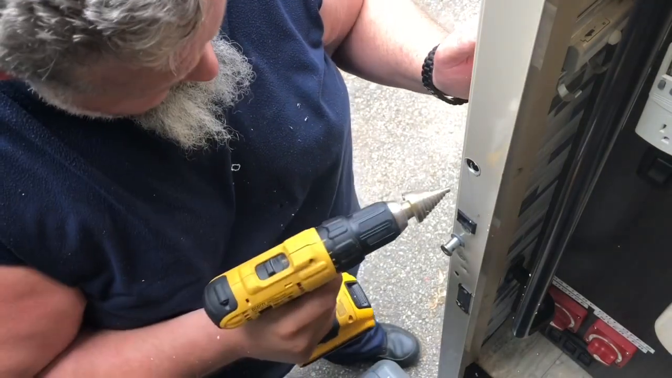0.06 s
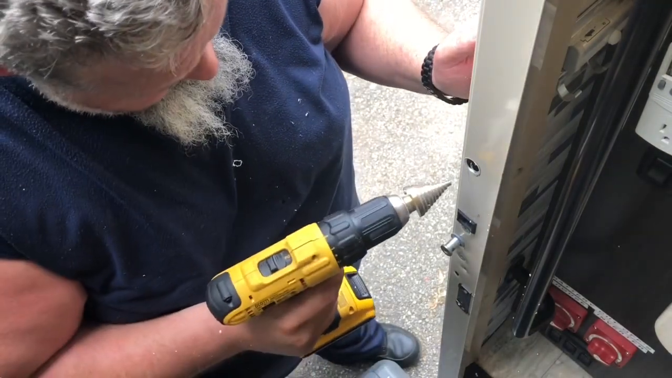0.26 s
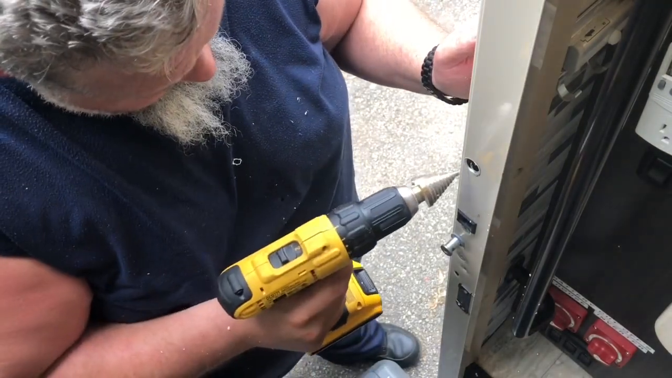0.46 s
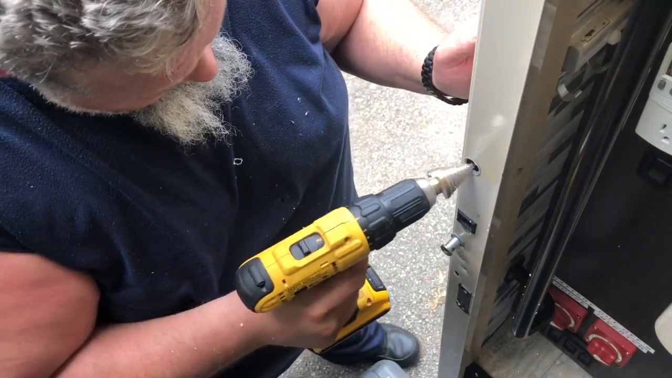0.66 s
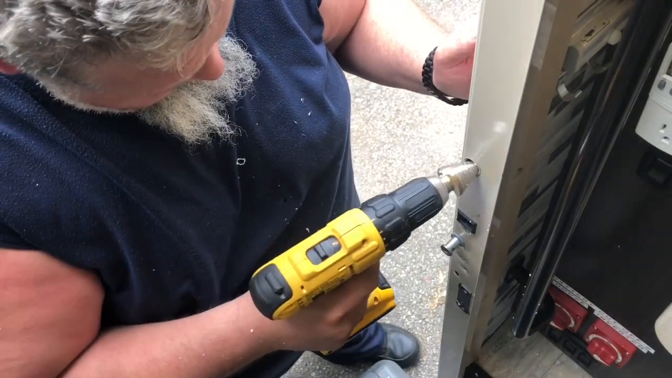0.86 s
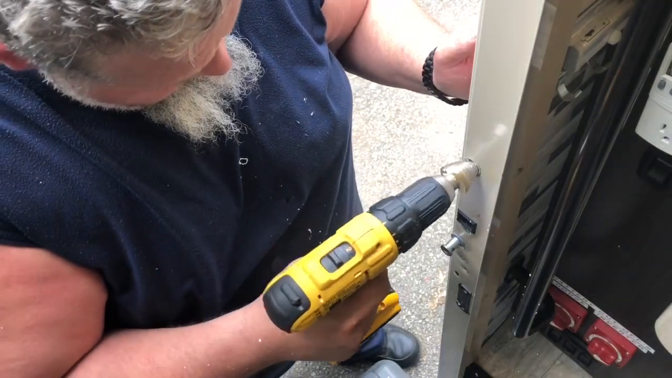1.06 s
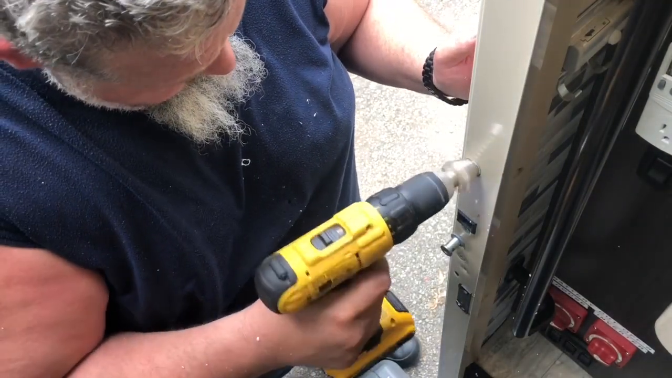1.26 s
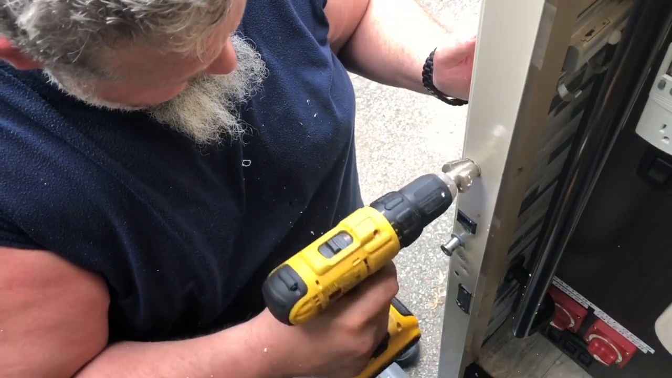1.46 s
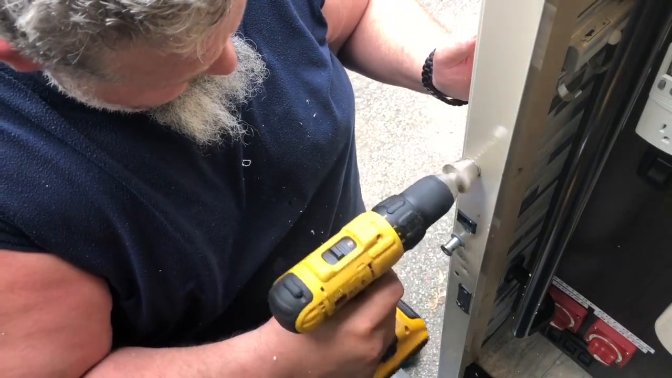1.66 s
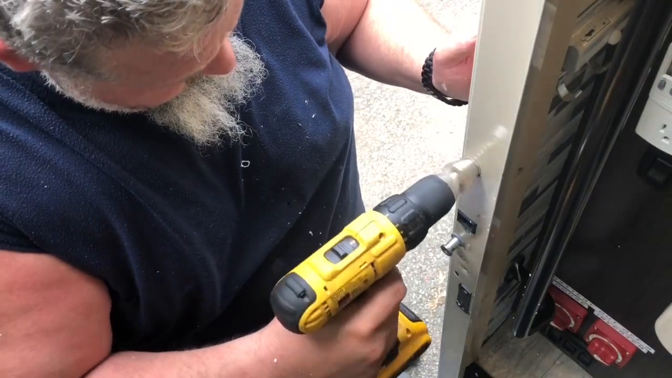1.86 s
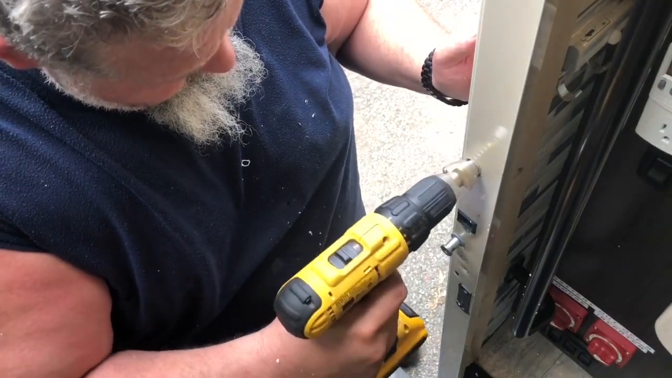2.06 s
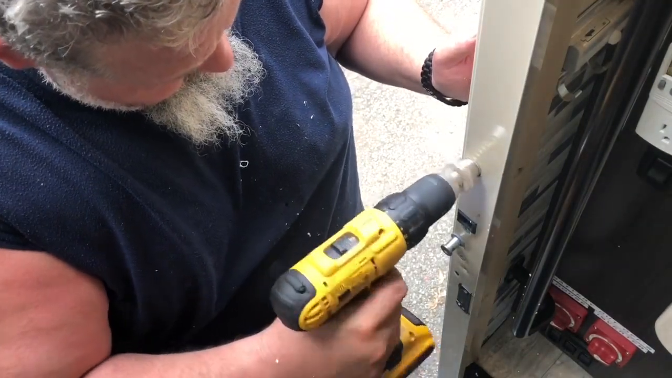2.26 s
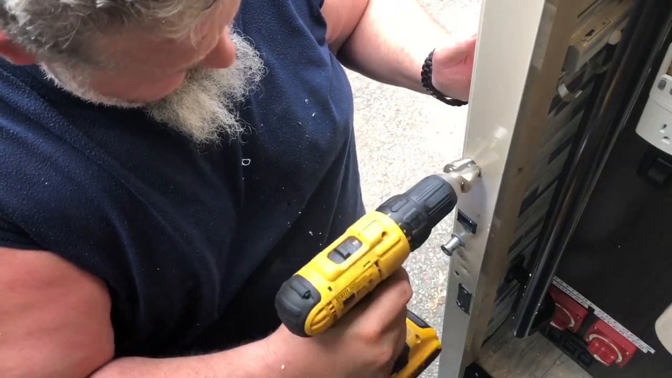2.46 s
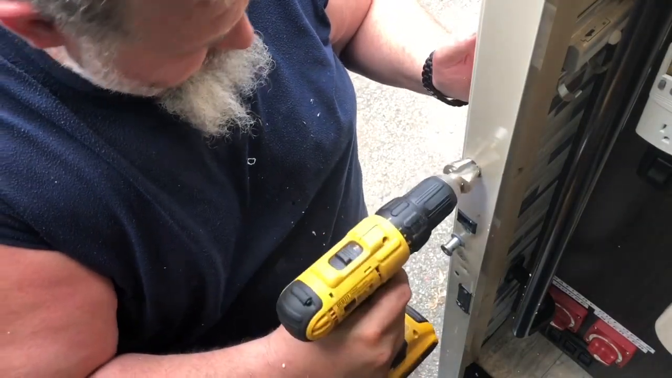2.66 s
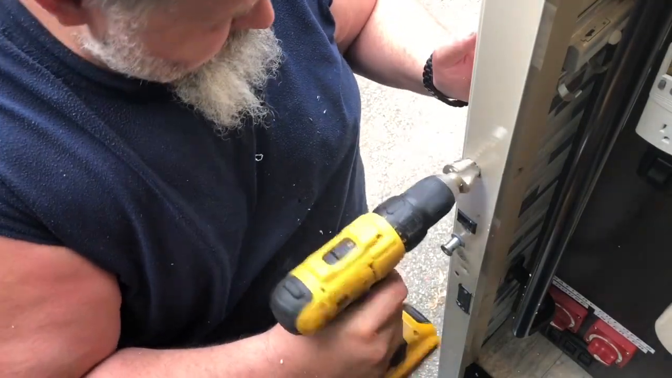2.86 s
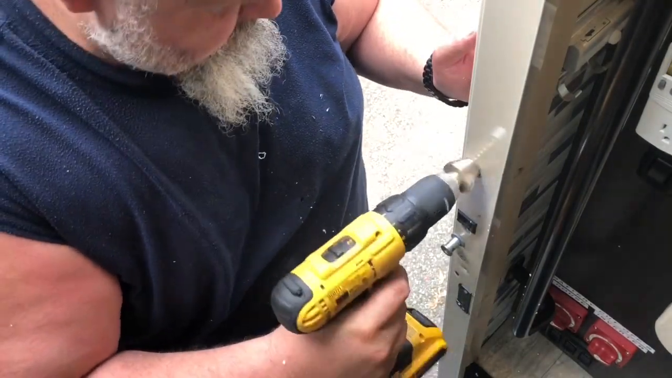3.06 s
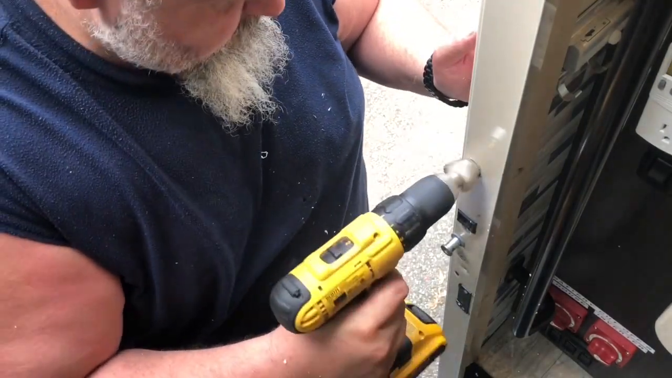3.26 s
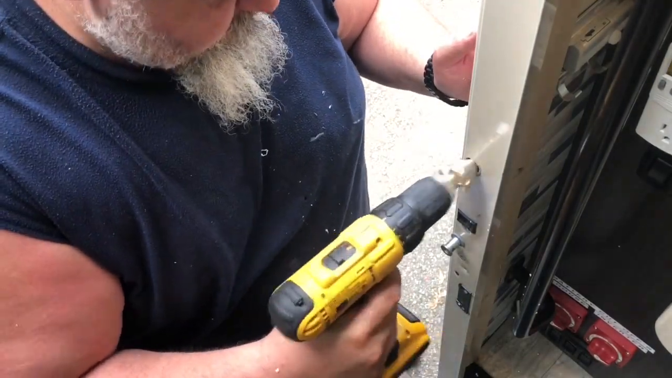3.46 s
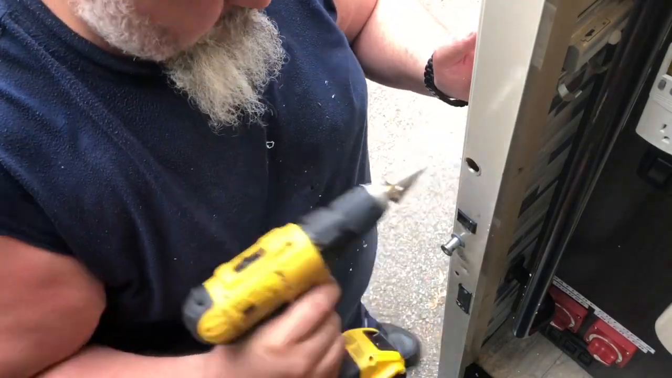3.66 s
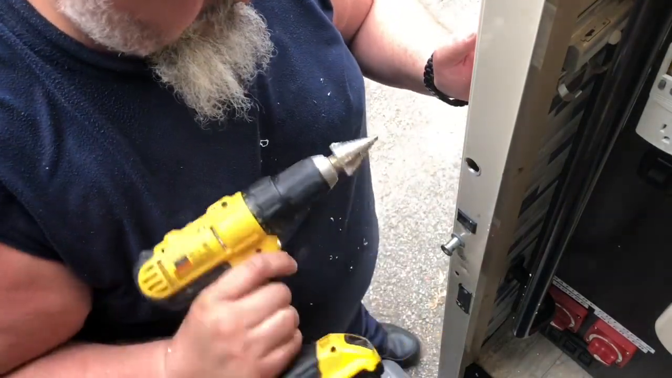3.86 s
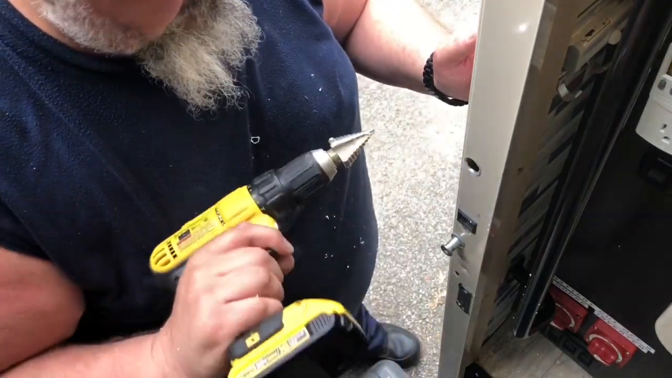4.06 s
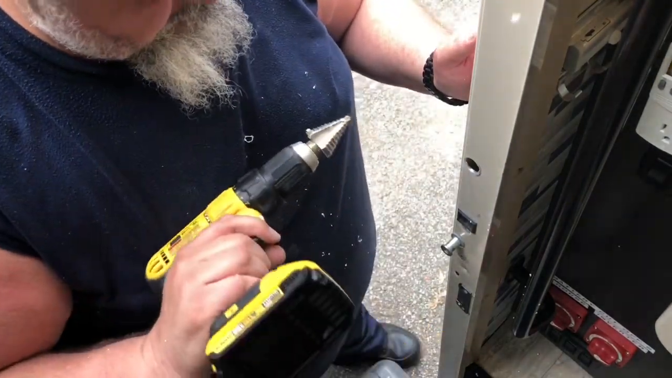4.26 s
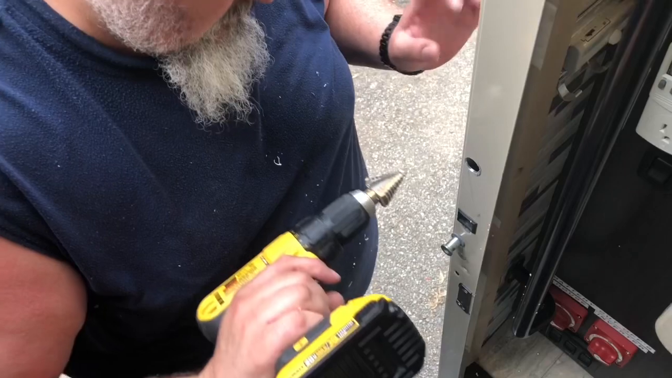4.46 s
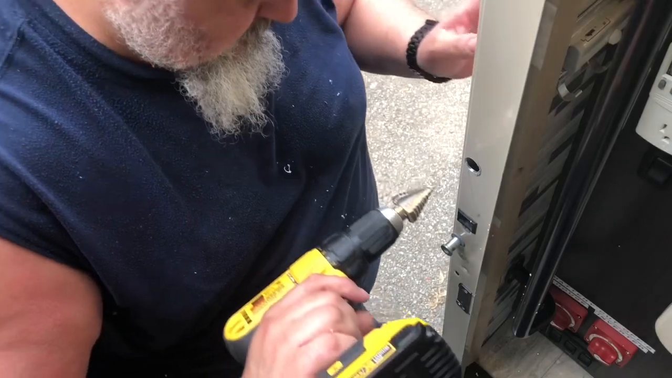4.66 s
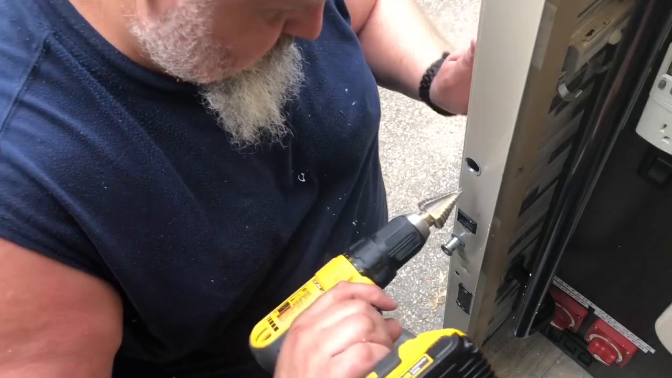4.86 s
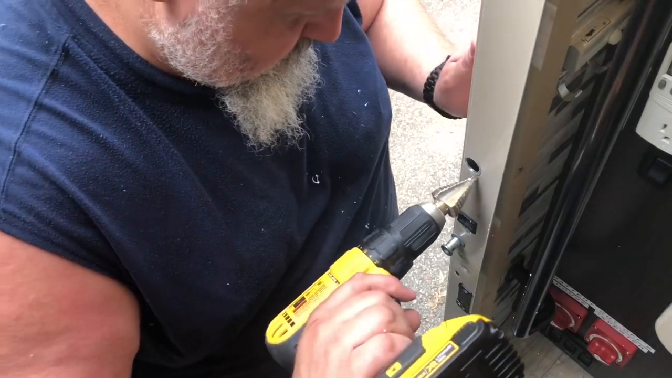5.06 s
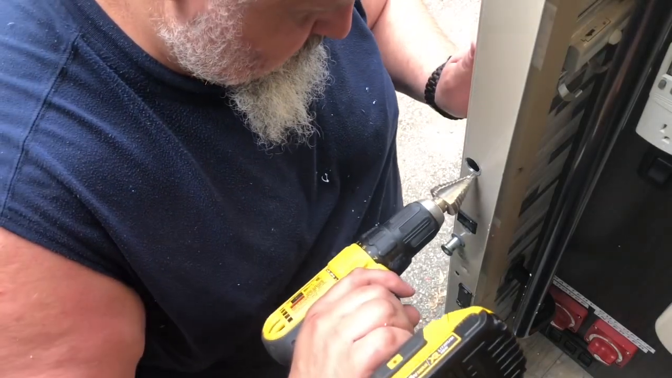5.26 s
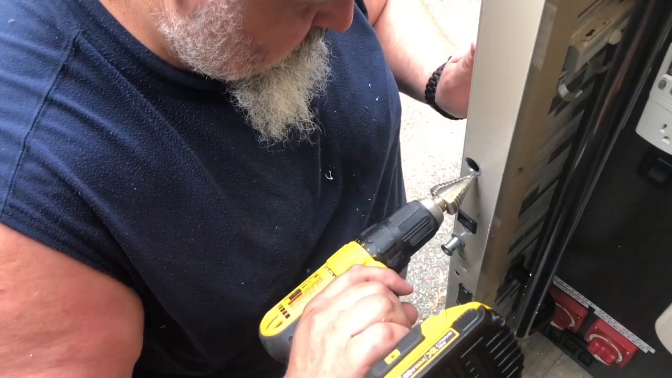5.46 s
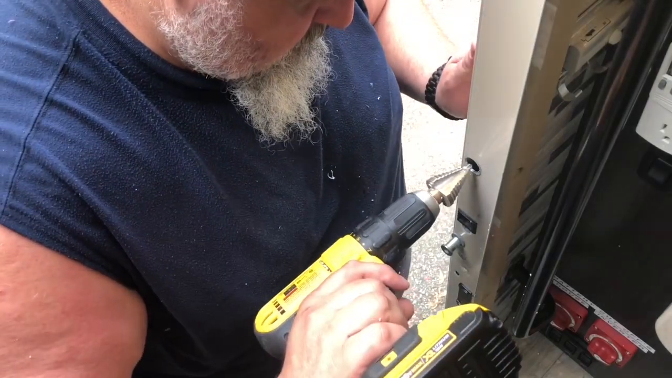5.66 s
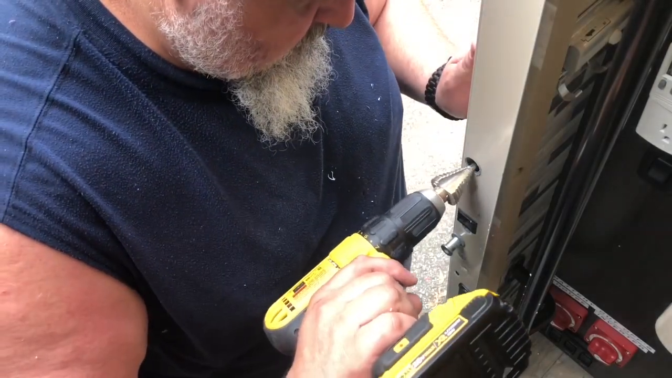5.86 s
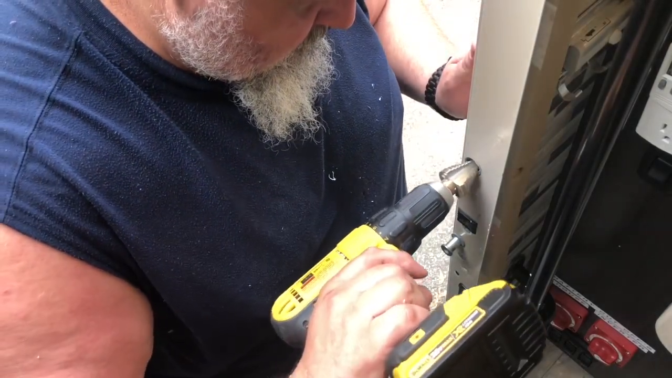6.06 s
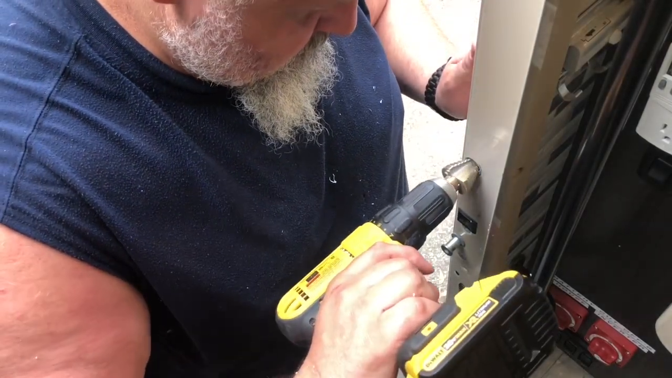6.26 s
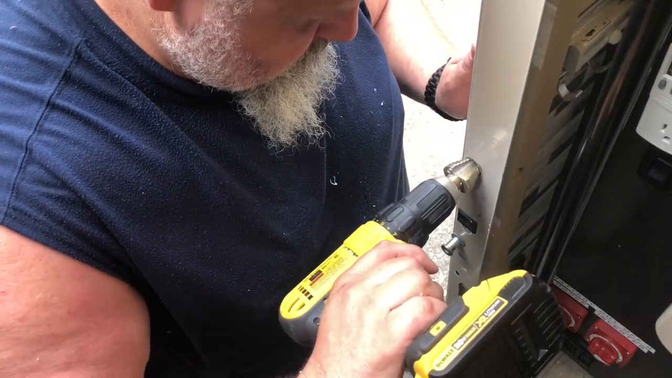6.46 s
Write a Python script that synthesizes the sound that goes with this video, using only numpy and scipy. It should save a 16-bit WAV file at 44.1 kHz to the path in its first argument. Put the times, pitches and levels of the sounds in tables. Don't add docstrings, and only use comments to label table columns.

```python
import sys
import numpy as np
from scipy import signal
from scipy.fft import rfft, irfft, next_fast_len
from scipy.io import wavfile
from scipy.ndimage import uniform_filter1d, map_coordinates

SR = 44100
rng = np.random.default_rng(int(sys.argv[2]) if len(sys.argv) > 2 else 0)


def unload_wav(signal):
    wavfile.write(
        sys.argv[1],
        SR,
        np.round(np.clip(np.atleast_2d(signal).T, -1, 1) * 32767).astype(np.int16),
    )


def linear_from_db(decibels):
    return 10 ** (np.asarray(decibels, float) / 20)


N = 287091

# time in seconds, hum level in dB, change of the air leak in dB.
SHOP_LEVELS = [(0, -37.5, -0.5), (1.5, -36, 1.5), (2.8, -37.5, 0.5), (3.6, -37.5, 1.5), (4.4, -39, 1.5),
               (5.1, -37, -1), (5.8, -35, 1), (6.51, -38, 2.5)]
# frequency in Hz, level in dB.
MOTOR_TONES = [(163.5, -38), (930, -57.5), (1140, -62), (120, -47.5), (468, -60), (354, -56)]
# frequency in Hz, level in dB per Hz.
HUM_COLOUR = [(15, -62), (25, -42), (70, -10), (138, -4), (153, -5), (176, -1), (195, -11), (264, -11),
              (299, -12), (349, -9.5), (379, -17.5), (448, -20.5), (494, -23.5), (700, -26), (910, -30),
              (1540, -120)]
HISS_COLOUR = [(350, -1.5), (500, 1.5), (950, -0.5), (1500, -3), (2500, -6.5), (4000, -12), (6000, -38)]
AIR_COLOUR = [(3500, -5.5), (5000, 0.5), (7000, -4.5), (9000, -10.5), (16000, -18)]
# time in seconds, gain as a plain factor.
SCENE_CHANGE = [
    (4.235, 0.91),
    (4.277, 0.0092),
    (4.305, 0.92),
]

# frequency in Hz, level in dB, time to fall 60 dB in seconds.
FRAME_MODES = [(290, -4, .1), (350, 0, .1), (468, 0, .09), (590, -1, .07), (710, 0, .07), (810, -1, .07),
               (1050, -2, .06), (1285, -2, .06), (1470, -5, .05), (1600, -3, .06), (1910, -6, .045),
               (2325, -7, .04), (3300, -8, .035), (3570, -10, .035), (4290, -10, .04)]
# frequency in Hz, sharpness, depth from 0 to 1.
HOLLOW = (2800, 4.5, .55)
# frequency in Hz, level in dB per Hz.
BITE_COLOUR = [(700, -10), (1400, 4.5), (2300, 1), (3400, 3), (4600, 3.5), (6500, -9.5), (10000, -47)]
TAP_COLOUR = [(800, -4.5), (1400, 2), (2200, 0), (3400, -2.5), (4800, -4), (6500, -19.5), (11000, -34)]
CLICK_COLOUR = [(1200, -32), (2000, -8), (2400, 3), (3300, 0), (4500, 3), (6500, -1), (11000, -24)]
FIZZ_COLOUR = [(4000, -32), (6000, 0.5), (9000, 9), (12000, 4), (16000, -2.5)]

# frequency in Hz, level in dB, time to fall 60 dB in seconds.
SPRING_TONES = [(8100, -48, 0.07), (11500, -29, .02), (13800, -36, 0.08)]
# time in seconds, peak in dB, time to fall 60 dB in seconds.
CHIP_DROPS = [
    (1.496, -30, .012),
    (1.509, -43, .01),
    (1.9936, -45, .012),
    (2.0391, -45, .012),
    (2.0601, -45, .01),
    (2.484, -50, .012),
    (2.563, -48, .01),
]
# time in seconds, peak in dB, brightness in dB.
HAND_CLICKS = [(0.5693, -48, -6), (3.1293, -37, -11), (3.1474, -38, 0), (3.1832, -20, -3.5),
               (3.207, -27, -10), (3.4642, -20, -12), (3.5543, -32.5, -9), (3.649, -29, -1.5),
               (3.939, -36, -2), (3.9544, -44, -12), (4.0638, -45, -3), (0.8037, -25, -12)]
# time in seconds, peak in dB, frame ring in dB, brightness in dB,
# centre of the ring in Hz.
TAPS = [(.6654, -34, 9, -9, 660), (.7339, -27.5, -1, -15, 479), (.779, -31, -8, -5, 1688),
        (.8018, -17, -7.5, -11, 697), (.833, -27.5, -2, -7, 686), (.8928, -20.5, 0, -3.5, 1550),
        (.939, -31, -1, -7, 755), (3.4243, -12, -4, -6.5, 1940), (3.4268, -15, -6, -9, 1300),
        (3.4348, -15, -15, -6, 1624), (3.4375, -17, -15, -6, 1300), (3.4916, -21, -3, -7, 700),
        (3.4965, -26, 5, -6, 416), (3.506, -27.5, 0, -1, 700), (5.0497, -18, -11, -15.5, 466),
        (5.8488, -32.5, 0.5, -4, 487), (5.9234, -19.5, -11.5, -11, 1463), (5.9314, -23.5, -20, -5, 464),
        (6.0132, -2, -11, -19, 786), (6.0344, -23.5, -2, -14, 474), (6.0494, -24, -12, -11, 456.5),
        (6.0994, -35, 12.5, -18, 476.4), (6.2963, -21, -3, 0, 1400), (6.3044, -19.5, -7, -19, 1638)]
# start in seconds, end in seconds, peak in dB, centre of the ring in Hz.
SKIDS = [
    (0.655, 0.659, -28, 1500),
    (3.481, 3.486, -27, 680),
    (3.514, 3.519, -27.5, 2400),
    (5.969, 5.989, -33, 480),
    (6.079, 6.088, -27, 900.6),
    (6.281, 6.302, -25, 1409),
]
# time in seconds, peak in dB.
SLAMS = [
    (6.0132, -3),
    (3.2979, -3),
]

# time in seconds, peak in dB, frame ring in
# dB, brightness in dB, centre of the ring in Hz.
EDGE_BITES = [(1.0934, -6.5, -13, -11, 1600), (1.1209, -1, -2.5, -2.5, 760), (1.1644, -25, 3, -9, 694),
              (1.2144, -10, 3.5, 5, 700), (1.2474, -10.5, 2, 6.5, 750), (1.2794, -19, -25, -20, 458.5),
              (1.3034, 11, -11.5, -8, 1230), (1.3359, 11.5, -12.5, -8.5, 425), (1.3773, 1, -3, -29, 454),
              (1.6581, -0.5, -6, -4.5, 560), (1.6944, -5.5, 0.5, -12, 310), (1.717, 0, -6, -14, 1570),
              (1.7564, -5, 3, -15, 471), (1.7779, 3, -2.5, -20, 403.6), (1.8213, 8, -16, -19, 480),
              (1.8472, 3, -4.5, -6, 1220), (1.8874, -12.5, 4, -15, 480), (1.9194, -19, 8.5, -10.5, 483),
              (2.1858, 5.5, -28, -8, 611), (2.2436, 2.5, -21, -17, 668), (2.2639, -6.5, -8, -1, 358),
              (2.9214, -5, -3.5, -2, 547), (2.9542, 2, -10, -12, 716), (2.9796, 7, -17.5, -11, 716),
              (3.0172, -1.5, -21, -5, 813), (3.0646, -18.5, 9.5, -25, 322), (3.2563, -15, 2, 7.5, 600),
              (3.2979, 3, -5, -16, 760), (3.3276, -0.5, 0, -8, 730), (3.3594, -13, 2.5, 8, 690)]
# time in seconds, frequency in Hz, peak in dB, length in seconds.
MODE_SHUDDERS = [(1.125, 800, -9.5, 0.0075), (1.135, 320, -16, 0.009), (1.172, 690, -14.5, 0.012),
                 (1.22, 605, -14, 0.016), (1.231, 746, -12.5, 0.016), (1.253, 770, -13, 0.012),
                 (1.283, 463, -15, 0.011), (1.307, 1260, -15, 0.016), (1.319, 350, -6, 0.0062),
                 (1.338, 910, -12.5, 0.012), (1.344, 1280, -17, 0.014), (1.345, 457, -14, 0.012),
                 (1.353, 327, -11, 0.0087), (1.384, 1040, -17, 0.027), (1.388, 490, -14, 0.028),
                 (1.664, 543, -15.5, 0.011), (1.695, 1300, -17, 0.011), (1.702, 306, -14, 0.0078),
                 (1.728, 1603, -14.5, 0.017), (1.73, 797, -14.5, 0.014), (1.736, 384, -13.5, 0.023),
                 (1.769, 360.1, -20, 0.032), (1.781, 820, -17, 0.012), (1.79, 430, -8, 0.008),
                 (1.811, 577, -15, 0.017), (1.828, 483, -16, .028), (1.85, 910, -14, 0.018),
                 (1.852, 1270, -17, 0.012), (1.867, 484, -17, 0.015), (1.897, 488, -19, 0.028),
                 (2.184, 395, -22, 0.0088), (2.195, 600, -19, 0.015), (2.252, 690, -18, 0.011),
              (2.254, 1055, -16, 0.017), (2.267, 366, -13, 0.0081), (2.294, 620, -21, 0.014),
              (2.387, 380, -22, 0.0088), (2.926, 780, -21, 0.016), (2.93, 546, -18, 0.015),
              (2.939, 760, -18, 0.0074), (2.958, 756, -19, 0.013), (2.962, 323, -20.5, 0.017),
              (2.967, 644, -28, 0.0086), (2.988, 716, -19, 0.014), (2.991, 330, -22, .012),
              (3.071, 1294, -19, 0.015), (3.08, 332, -19.5, 0.017), (3.263, 1297, -19, 0.02),
              (3.264, 620, -12, 0.012), (3.281, 345, -19, 0.013), (3.307, 770, -19, .009),
              (3.337, 740, -12, 0.01), (3.363, 710, -11.5, 0.014), (3.36, 350, -26, 0.013),
                 (.659, 2350, -36, .006), (.674, 1610, -36.5, 0.012), (0.671, 676, -35, 0.024),
               (.785, 1590, -42, 0.017), (.806, 2320, -32, 0.0095), (.81, 1080, -30, 0.0092),
               (0.814, 684, -31, 0.013), (.897, 2320, -30, 0.0086), (.9, 1635, -31, 0.017),
               (.901, 1060, -27, 0.008), (3.499, 740, -19.5, 0.005), (3.504, 330, -20.5, 0.006),
               (6.015, 3340, -15, 0.0038), (6.016, 1570, -18.5, 0.0076), (6.018, 850, -17.5, 0.0039),
               (6.087, 1520, -28.5, 0.0048), (6.1, 846, -24, 0.0037), (6.106, 480, -30, 0.016),
               (5.052, 1480, -31, 0.00389), (5.06, 470, -33, 0.014), (5.927, 1470, -35, 0.0057),
               (5.936, 470, -34, .01), (6.301, 1460, -30, 0.011), (6.302, 1140, -27, 0.0069),
               (0.742, 400, -33, 0.0052), (1.095, 1600, -32, 0.0064), (1.098, 800, -31, .008),
                 (1.123, 3270, -15.5, .007), (1.125, 1260, -21, 0.0087), (1.213, 1250, -19, 0.012),
              (1.25, 1550, -25, .007), (1.304, 1528, -22, .007), (1.306, 1910, -15, 0.01),
              (1.306, 3220, -21, 0.0098), (1.34, 3550, -14, 0.0092), (1.341, 1510, -17, .009),
              (1.38, 1490, -21, 0.011), (1.788, 1490, -18, .01), (1.783, 1940, -16, .007),
              (1.824, 1550, -14, 0.0091), (1.851, 3400, -19, .008), (2.982, 2320, -15, 0.0078),
              (2.983, 1650, -17, 0.013), (2.984, 4300, -23, .008), (3.021, 1910, -20, .008),
              (3.305, 1310, -20, 0.011), (3.33, 1550, -12, 0.0087), (3.331, 2330, -18, .008),
              (3.33, 4290, -20, .008), (6.015, 4270, -18, .005), (6.015, 5000, -23, .005),
              (6.019, 2350, -26, 0.0066), (3.185, 3230, -31, .006), (3.493, 2400, -29, .007)]

# start in seconds, end in seconds, level in dB.
TRIGGER_WHINES = [
    (1.063, 1.113, -28),
    (1.582, 1.614, -28),
    (2.055, 2.084, -27.5),
    (2.831, 2.863, -31),
    (3.219, 3.233, -26),
]
# frequency in Hz, level in dB.
WHINE_TONES = [(3903, -30.5), (7811, -48.5), (11806, -54), (15687, -68)]

# time in seconds, rate at which gear teeth meet in Hz.
PULL_SPEEDS = [
    [(1.091, 400), (1.13, 2500), (1.16, 3100), (1.19, 3400), (1.23, 3500), (1.28, 3200), (1.36, 3000),
     (1.44, 1000), (1.48, 180)],
    [(1.6, 500), (1.63, 1950), (1.66, 2800), (1.69, 3300), (1.73, 3600), (1.8, 3400), (1.89, 3250),
     (1.945, 1500), (1.995, 180)],
    [(2.075, 500), (2.097, 1570), (2.122, 1800), (2.15, 2650), (2.2, 3050), (2.262, 3480), (2.285, 3350),
     (2.317, 2800), (2.36, 1800), (2.468, 450)],
    [(2.855, 550), (2.886, 1700), (2.908, 2700), (2.936, 2680), (2.978, 3300), (3.02, 2720), (3.075, 1900),
     (3.1, 550), (3.125, 180)],
    [(3.225, 500), (3.275, 2600), (3.31, 3400), (3.36, 3300), (3.42, 1500), (3.46, 250)],
]
# time in seconds, push in dB,
# share of the upper frame modes from 0 to 1.
PULL_PUSHES = [
    [(1.09, -6, 0.1), (1.15, -1.5, 0.04), (1.21, -6.5, 1), (1.27, -3, 0.86), (1.31, 1, 0.05),
     (1.39, 2, 0.03), (1.47, -7.5, 0.8)],
    [(1.6, -1, 0.3), (1.67, -2, 0.3), (1.8, 6, 0.2), (1.9, 1.5, 0.33), (1.99, -2.5, 1)],
    [(2.08, -0.5, 0.6), (2.185, 0.5, 0.3), (2.24, -6, 0.35), (2.32, 0.5, 0.86), (2.46, -4, 0.2)],
    [(2.86, 0, 0.9), (2.93, -1, 0.5), (2.98, -0.5, 0.7), (3.06, -4, 0.95), (3.12, 6, 0.6)],
    [(3.23, 0.5, 0.5), (3.27, 0.5, 1), (3.32, -5.5, 0.97), (3.39, 0, 0.7), (3.45, -9.5, 0.1)],
]
PULL_MESH_DB = [-15, -12, -15, -19, -15]
# start in seconds, end in seconds, lift in dB.
SINGING_TEETH = [(1.14, 1.19, 5), (1.265, 1.295, 7), (1.62, 1.7, 6.5), (1.875, 1.905, 5), (2.09, 2.125, 12),
                 (2.13, 2.165, 7), (2.178, 2.198, 3), (2.2, 2.235, 10), (2.235, 2.268, 7.5),
                 (2.268, 2.318, 11), (2.352, 2.404, 8), (2.872, 2.892, 11), (2.905, 2.95, 13),
                 (2.962, 2.98, 9), (2.995, 3.02, 9), (3.265, 3.37, 3)]
# frequency in Hz, width in Hz.
HOUSING = (3100, 900)
# frequency in Hz, width in Hz, level in dB.
HOUSING_OVERTONE = (5700, 600, -11)
# frequency in Hz, width in Hz, level in dB.
SHELL_MODES = [(2320, 45, -0.5), (3306, 90, -2), (4290, 79, -0.5), (4770, 100, -1), (5290, 110, -5.5),
               (8000, 160, -5.5), (10180, 200, -7)]
# frequency in Hz, level in dB per Hz.
WHIRR_COLOUR = [(900, 1), (1500, 0.5), (2500, -6), (3300, -2.5), (4500, -3.5), (6500, -9.5), (8000, -10),
                (10000, -8), (13000, -14.5), (16000, -13.5)]
SCRAPE_COLOUR = [(200, -8), (300, 0.5), (600, -2), (1100, -8), (1600, -6.5), (2300, -7.5), (4000, -17),
                 (8000, -27.5)]

STRIKE_HZ, STRIKE_S = 4000, 0.0002
TEETH = 9


def unit(x):
    return x / np.sqrt(np.mean(x ** 2) + 1e-20)


def along(points, hz):
    f, v = np.transpose(points)
    return np.interp(np.log(hz + 1), np.log(f + 1), v)


def curves(rows, n=N, start=0):
    s, *cols = np.transpose(rows)
    times = (start + np.arange(n)) / SR
    return [np.interp(times, s, c) for c in cols]


def coloured(x, points):
    m = next_fast_len(len(x) + 4096)
    hz = np.fft.rfftfreq(m, 1 / SR)
    f = np.transpose(points)[0]
    inside = (hz > f[0] / 2) & (hz < f[-1] * 2)
    shaped = irfft(rfft(x, m) * linear_from_db(along(points, hz)) * inside, m)
    return unit(shaped[:len(x)])


def patchy(n, patchy_db, size=(5, 8)):
    z = signal.stft(rng.standard_normal(n + 512), nperseg=512)[2]
    field = uniform_filter1d(rng.standard_normal(z.shape), size[0], 0)
    field = uniform_filter1d(field, size[1], 1)
    return signal.istft(z * linear_from_db(patchy_db * unit(field)), nperseg=512)[1][:n]


def wobble(n, rate):
    knots = rng.standard_normal(int(n * rate / SR) + 4)
    return map_coordinates(knots, [np.arange(n) * rate / SR])


def shop():
    hum_db, leak_db = curves(SHOP_LEVELS)
    swing_db = 0.125 * (hum_db - hum_db.mean())
    t = np.arange(N) / SR
    since = t - SCENE_CHANGE[1][0]
    lift_db = 3 * (since > 0) * np.exp(-np.abs(since) / 0.24)
    hum = linear_from_db(hum_db) * coloured(patchy(N, patchy_db=1, size=(2, 10)), HUM_COLOUR)
    tones = np.zeros(N)
    for hz, db in MOTOR_TONES:
        phase = 2 * np.pi * hz * t + 0.6 * wobble(N, 12) * (1 + hz / 400)
        tones += linear_from_db(db + 2.5 * wobble(N, 6)) * np.sin(phase)
    hiss = linear_from_db(-49.5 + swing_db) * coloured(patchy(N, patchy_db=1.5), HISS_COLOUR)
    air = linear_from_db(-58.5 + leak_db + lift_db) * coloured(patchy(N, patchy_db=-1.5), AIR_COLOUR)
    return hum + tones + hiss + air


def spring_ping():
    t = np.clip(np.arange(N) / SR - 3.508, 0, None)
    out = np.zeros(N)
    for hz, db, t60 in SPRING_TONES:
        out += linear_from_db(db - 60 * t / t60 + 3 * wobble(N, 150)) * np.sin(2 * np.pi * hz * t)
    return out


def chips_fall():
    out, t = np.zeros(N), np.arange(SR // 20) / SR
    for s, db, t60 in CHIP_DROPS:
        shape = linear_from_db(db - 60 * t / max(t60, 0.003)) * (1 - np.exp(-t / 0.0004))
        out[round(s * SR):][:len(t)] += shape * coloured(rng.standard_normal(len(t)), FIZZ_COLOUR)
    return out


def frame_ring(t, spread_db, centre_hz, reach, travel):
    hz, db, t60 = np.transpose(FRAME_MODES)[:, :, None]
    db = db - (np.log2(hz / centre_hz) / reach) ** 2 + spread_db * rng.standard_normal(hz.shape)
    swell = 1 - np.exp(-(t * hz / travel) ** 3)
    tones = np.sin(2 * np.pi * (hz * t + rng.random(hz.shape)))
    return np.sum(linear_from_db(db - 60 * t / t60) * swell * tones, 0)


def steel_push(t):
    return np.exp(-t / STRIKE_S) * np.sin(2 * np.pi * STRIKE_HZ * t)


def contacts(table, colour, crack_db, clang_db, ring_db, thud_db, reach, rise, snap, damp_db, strike_db):
    out, t = np.zeros(N + SR), np.arange(SR // 5) / SR
    strike = steel_push(t)
    for s, db, low_db, bright_db, t60, centre_hz in table:
        fall = linear_from_db(-60 * t / max(t60, 0.005))
        quick = snap * linear_from_db(-60 * t / 0.0032)
        tail = 0.03 * linear_from_db(-60 * t / 0.62)
        shape = (1 - np.exp(-t / rise)) * (fall + quick + tail)
        crack = coloured(rng.standard_normal(len(t)), colour) * shape
        fizz = coloured(rng.standard_normal(len(t)), FIZZ_COLOUR) * shape
        fizz = fizz * (0.7 + linear_from_db(-60 * t / 0.031))
        clang = frame_ring(t, spread_db=2.0, centre_hz=2730, reach=0.64, travel=0.93)
        ring = frame_ring(t, spread_db=1.5, centre_hz=centre_hz, reach=reach, travel=4.5)
        thud = frame_ring(t, spread_db=2.0, centre_hz=350, reach=0.51, travel=3.2)
        hit = linear_from_db(crack_db) * (crack + linear_from_db(bright_db - 2.5) * fizz + linear_from_db(strike_db) * strike)
        body = linear_from_db(clang_db) * clang + linear_from_db(ring_db) * ring + linear_from_db(thud_db) * thud
        body = body * linear_from_db(-damp_db * t)
        out[round(s * SR):][:len(t)] += linear_from_db(db) * (hit + linear_from_db(low_db) * body)
    return out[:N]


def blows(table, t60):
    return [(s, db, ring_db, bright_db, t60 * linear_from_db(0.25 * ring_db), hz)
            for s, db, ring_db, bright_db, hz in table]


def snappy(rows):
    return [(s, db, ring_db, bright_db, t60 * linear_from_db(-0.2 * max(db + 26.5, 0)), hz)
            for s, db, ring_db, bright_db, t60, hz in rows]


def hollowed(x, depth):
    sharp = signal.iirpeak(*HOLLOW[:2], fs=SR)
    return x - depth * signal.lfilter(*sharp, x)


def hand():
    rows = [(s, db, -27, bright_db, 0.097, 500) for s, db, bright_db in HAND_CLICKS]
    return contacts(snappy(rows), CLICK_COLOUR, crack_db=-13.5, clang_db=-7, ring_db=-12.0, thud_db=-9.5,
                    reach=0.45, rise=0.00021, snap=0.8, damp_db=-8, strike_db=16)


def skid_touches():
    rows = []
    for t0, t1, db, hz in SKIDS:
        for s in np.linspace(t0, t1, 1 + round((t1 - t0) / 0.0045)):
            peak_db = db - 9 * (t1 - s) / (t1 - t0)
            peak_db += 3.5 * rng.standard_normal()
            rows.append((s, peak_db, -3.5, -5, 0.065, hz))
    return rows


def taps():
    rows = snappy(blows(TAPS, t60=0.13)) + skid_touches()
    hits = contacts(rows, TAP_COLOUR, crack_db=-12.0, clang_db=-10.0, ring_db=-2.0, thud_db=-5.5,
                    reach=0.32, rise=0.0001, snap=0.8, damp_db=300, strike_db=10)
    return hollowed(hits, HOLLOW[2])


def slams():
    out = np.zeros(N)
    for s, db in SLAMS:
        t = np.clip(np.arange(N) / SR - s, 0, None)
        out += linear_from_db(db) * steel_push(t)
    return out


def shudders(table):
    out = np.zeros(N)
    t = np.arange(-SR // 20, SR // 20) / SR
    for s, hz, db, length in table:
        u = t / np.where(t < 0, 0.4, 0.65) / max(length, 0.004)
        sag = 1 - 0.05 * t / length / 2
        tone = np.sin(2 * np.pi * (hz * t * sag + rng.random()))
        out[round(s * SR) - SR // 20:][:len(t)] += linear_from_db(db - 8.5 * u ** 2) * tone
    return out


def bites():
    hits = contacts(blows(EDGE_BITES, t60=0.057), BITE_COLOUR, crack_db=-15.5, clang_db=-7.5,
                    ring_db=-3.5, thud_db=-10.0, reach=0.16, rise=0.00085, snap=0.97, damp_db=346, strike_db=-4)
    return hollowed(hits, 0.35)


def trigger():
    out = np.zeros(N)
    for t0, t1, db in TRIGGER_WHINES:
        t = np.arange(round((t1 - t0) * SR)) / SR
        swell = (1 - np.exp(-t / 0.0072)) * np.clip((t[-1] - t) / 0.0046, 0, 1)
        tone = np.zeros(len(t))
        for hz, level in WHINE_TONES:
            level_db = level - WHINE_TONES[0][1] + hz / 2500 * wobble(len(t), 86)
            tone += linear_from_db(level_db) * np.sin(2 * np.pi * hz * t)
        out[round(t0 * SR):][:len(t)] += linear_from_db(db - 1.5) * swell * tone
    return out


def rattle(n):
    knocks = rng.standard_normal(n) * linear_from_db(2.5 * wobble(n, 119.6))
    total = np.zeros(n)
    for hz, width, db in SHELL_MODES:
        mode = unit(signal.lfilter(*signal.iirpeak(hz, hz / width, fs=SR), knocks))
        total += linear_from_db(db + 3.8 * wobble(n, 25.6)) * mode
    return unit(total)


def singing(a, b):
    t = np.arange(a, b) / SR
    lift_db = np.zeros(b - a)
    for t0, t1, db in SINGING_TEETH:
        lift_db += db * (t > t0) * (t < t1)
    return uniform_filter1d(lift_db, size=250)


def shell_gain(hz):
    main = 1 / np.hypot(1, (hz - HOUSING[0]) / HOUSING[1]) ** 2
    over_hz, over_width, over_db = HOUSING_OVERTONE
    return main + linear_from_db(over_db) / np.hypot(1, (hz - over_hz) / over_width) ** 2


def gear_whirr(n, turn):
    grains = linear_from_db(np.minimum(5 * rng.exponential(size=n), 14) * (rng.random(n) < 0.025))
    rubbing = patchy(n, patchy_db=2, size=(6, 2)) * (1 + 0.3 * np.cos(turn)) * grains
    whirr = coloured(rubbing, WHIRR_COLOUR) + linear_from_db(-9.5) * rattle(n)
    coast = np.clip(np.arange(n)[::-1] / (0.07 * SR), 0, 1)
    return whirr * coast


def gear_mesh(n, mesh_hz, turn):
    return sum(shell_gain(k * mesh_hz) * np.sin(k * TEETH * turn) * linear_from_db(1.5 * wobble(n, 90)) for k in (1, 2))


def frame_chatter(n, upper):
    rub = rng.standard_normal((3, n)) * linear_from_db(3.6 * wobble(n, 150))
    t = np.arange(SR // 8) / SR
    low_ring = frame_ring(t, spread_db=1, centre_hz=400, reach=0.22, travel=0.3)
    high_ring = frame_ring(t, spread_db=1, centre_hz=720, reach=0.17, travel=0.3)
    low = unit(signal.fftconvolve(rub[0], low_ring)[:n])
    high = unit(signal.fftconvolve(rub[1], high_ring)[:n])
    ringing = np.sqrt(1 - upper) * low + np.sqrt(upper) * high
    return 0.68 * ringing + 0.8 * coloured(rub[2], SCRAPE_COLOUR)


def burst(n, mesh_hz, mesh_db, whirr_db, chatter_db, upper):
    turn = 2 * np.pi * np.cumsum(mesh_hz * (1 + 0.005 * wobble(n, 150))) / SR / TEETH
    whirr = gear_whirr(n, turn)
    mesh = gear_mesh(n, mesh_hz, turn)
    shaft = linear_from_db(-18) * (np.sin(turn) + np.sin(2 * turn)) * linear_from_db(4 * wobble(n, 40))
    chatter = frame_chatter(n, np.clip(upper, 0, 1))
    edge = np.clip(np.minimum(np.arange(n), np.arange(n)[::-1]) / (0.0024 * SR), 0, 1)
    mix = whirr + linear_from_db(mesh_db) * mesh + linear_from_db(chatter_db - 4.5) * (chatter + shaft)
    return edge * linear_from_db(whirr_db + 5.5) * mix


def drill():
    out = np.zeros(N)
    for speed, push, pull_mesh_db in zip(PULL_SPEEDS, PULL_PUSHES, PULL_MESH_DB):
        a, b = round(speed[0][0] * SR), round(speed[-1][0] * SR)
        mesh_hz, = curves(speed, b - a, a)
        mesh_hz = uniform_filter1d(mesh_hz, size=500)
        push_db, upper = curves(push, b - a, a)
        speed_db = 20 * np.log10(mesh_hz / 3400)
        speeding_up = np.clip(np.gradient(mesh_hz) * SR / 20000, 0, 1)
        swept = uniform_filter1d(speeding_up, size=800)
        whirr_db = -23.5 + 1.42 * speed_db + 0.28 * push_db
        chatter_db = -22 + 1.04 * speed_db + push_db - whirr_db
        mesh_db = pull_mesh_db + singing(a, b) + 2 * swept - 0.2 * push_db
        mesh_db = mesh_db + wobble(b - a, 40.0)
        out[a:b] += burst(b - a, mesh_hz, mesh_db, whirr_db, chatter_db, upper)
    return out


def scene():
    no_bass = signal.butter(2, 170, "high", fs=SR, output="sos")
    tool = signal.sosfilt(no_bass, drill() + bites() + taps() + hand())
    small = trigger() + spring_ping() + chips_fall() + slams()
    mono = tool + small + shop() + shudders(MODE_SHUDDERS)
    return np.array([mono, mono])


def top_cut(x):
    return signal.sosfilt(signal.butter(12, 16680, fs=SR, output="sos"), x)


def record(dry):
    x = dry * curves(SCENE_CHANGE)[0]
    x = 0.96 * x / (1 + np.abs(x) ** 16) ** (1 / 16)
    x = signal.sosfiltfilt(signal.ellip(10, 0.1, 28, 15850, fs=SR, output="sos"), x)
    return top_cut(x)


dry = scene()
out = record(dry)
unload_wav(out)
```